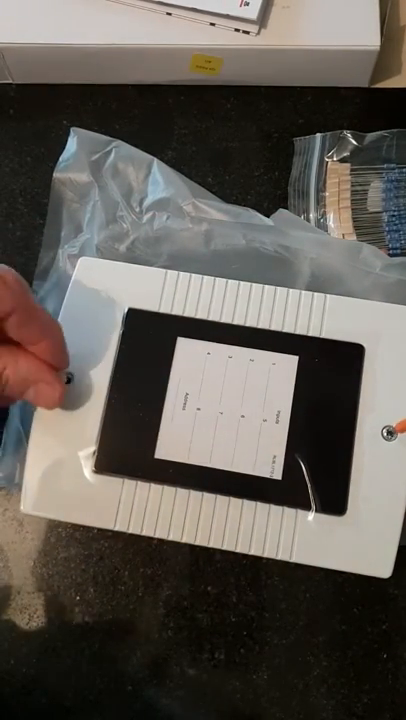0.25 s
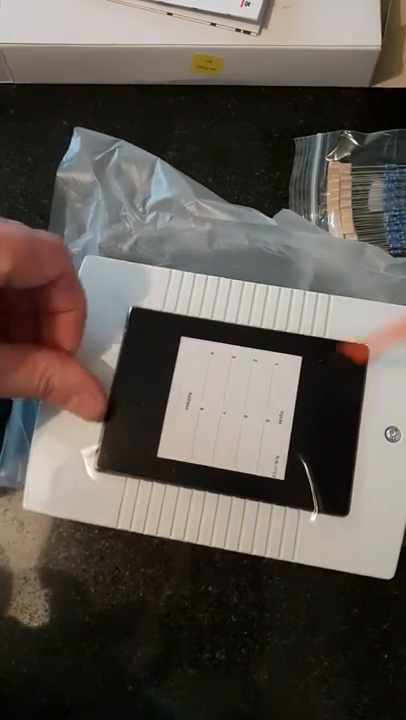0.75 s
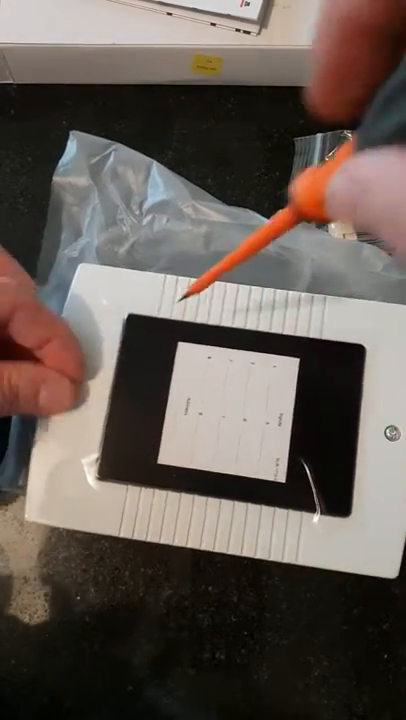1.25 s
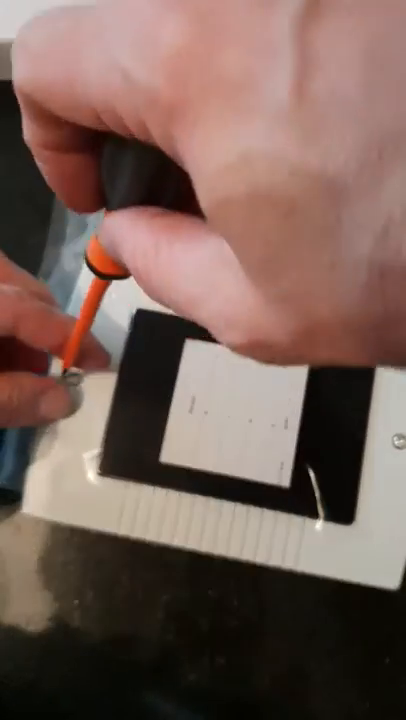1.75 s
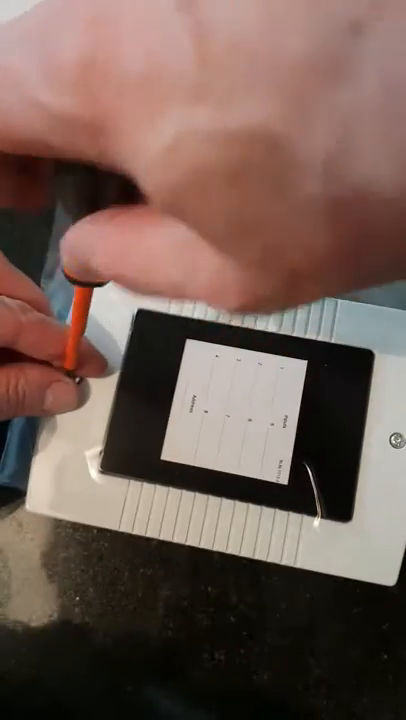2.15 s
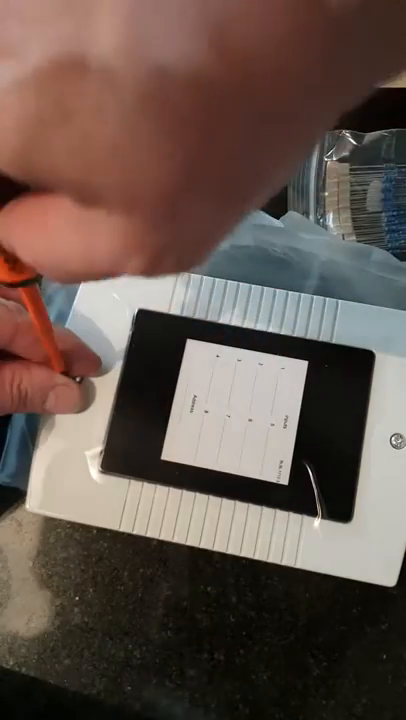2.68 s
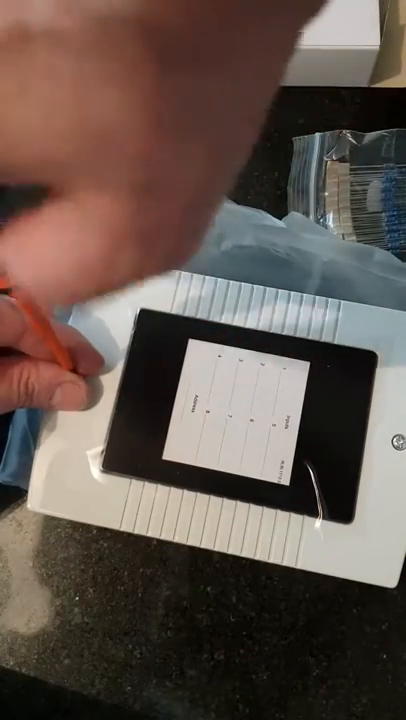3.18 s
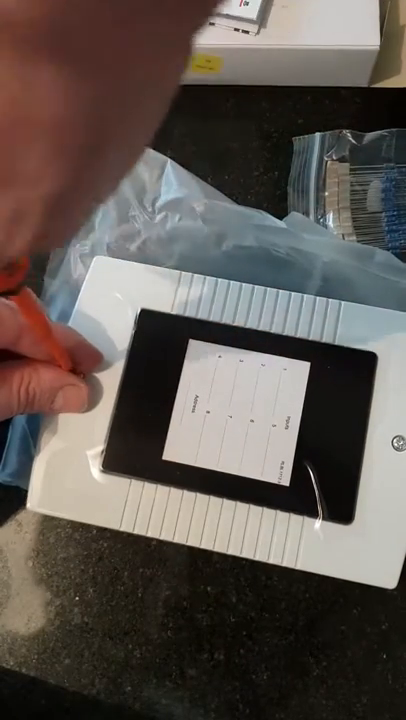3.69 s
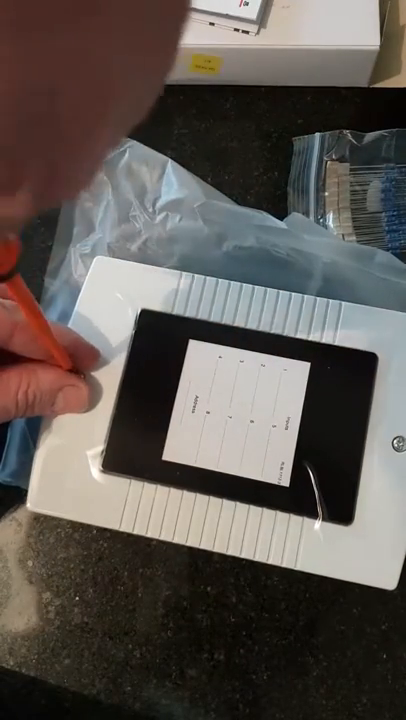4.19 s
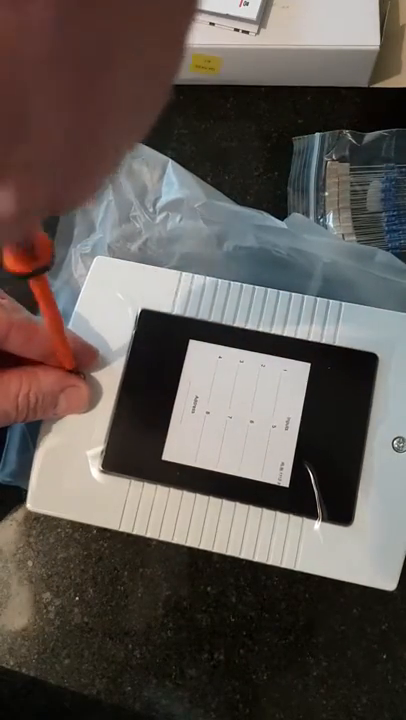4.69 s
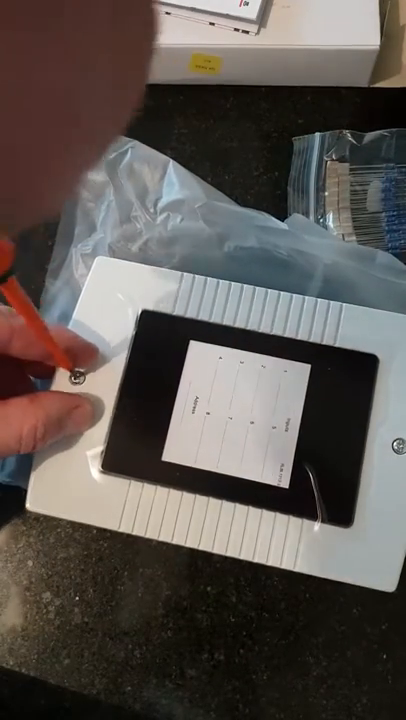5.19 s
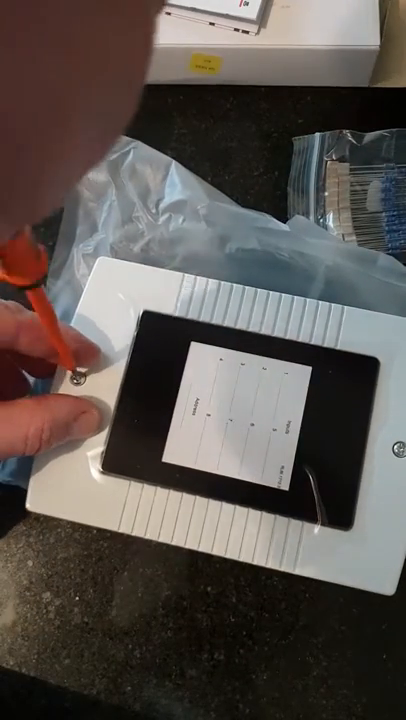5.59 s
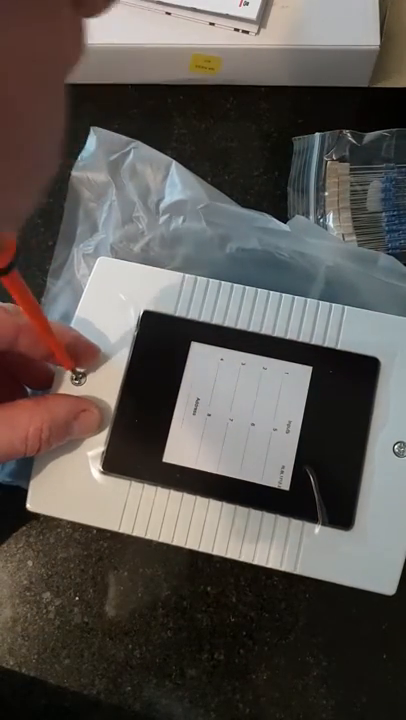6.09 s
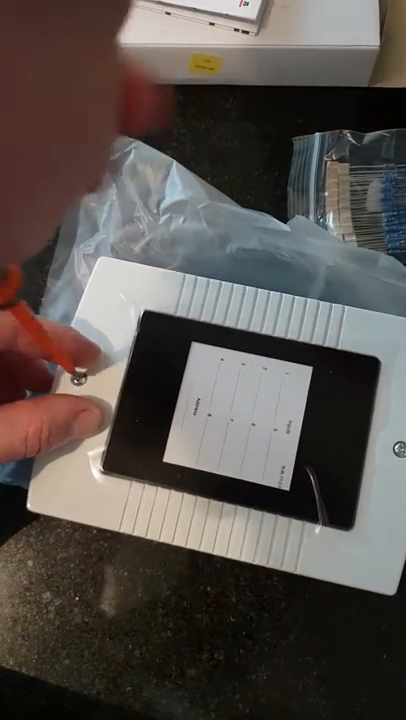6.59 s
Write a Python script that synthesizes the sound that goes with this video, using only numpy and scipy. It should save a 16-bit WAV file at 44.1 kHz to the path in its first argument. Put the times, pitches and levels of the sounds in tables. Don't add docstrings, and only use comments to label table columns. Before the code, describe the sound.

Quick light clicks of a screw settling in its hole, a brighter burst of tool rattles, a loud slip, then sparse irregular turning ticks. Each turn nudges the hollow plastic case into a short low knock, with fine metallic friction. Everything is near and detailed in a quiet indoor space, with slight hand rumble through the table.

```python
import sys
import numpy as np
from scipy import signal
from scipy.io import wavfile
from scipy.ndimage import uniform_filter1d

SR = 44100
rng = np.random.default_rng(int(sys.argv[2]) if len(sys.argv) > 2 else 0)


def linear_from_db(decibels):
    return 10 ** (np.asarray(decibels, float) / 20)


def wrap_up_sound(samples):
    columns = np.atleast_2d(samples).T
    tamed = np.clip(columns, -1, 1)
    steps = np.round(tamed * 32767).astype(np.int16)
    wavfile.write(sys.argv[1], SR, steps)


N = 302067

EDGES_HZ = 20 * 2 ** np.arange(0, 10.1, .5)
# [f/Hz, likeness/0-1]
LIKENESS = [(40, .5), (130, .92), (300, .97), (700, .8), (1500, .45), (3000, .1), (15000, 0)]
# [f/Hz, density/dB]
HUSH_SPECTRUM = [(20, -30), (75, -1.5), (170, -15.5), (500, -21), (1000, -32.5), (2400, -29), (7000, -35.5),
                 (15500, -33)]
# [t/s, rumble level/dB]
LEAN = [(0.0, -63), (0.32, -78.5), (0.59, -55.5), (0.86, -62.5), (1.93, -74.5), (2.4, -64), (2.56, -61),
        (3.45, -73.5), (3.53, -69.5), (3.95, -62.5), (4.3, -62.5), (5.95, -69.5), (6.85, -67.5)]
# [f/Hz, t60/s, level/dB]
ROOM = [(94, 0.45, -2.5), (296, 0.24, -1), (960, 0.34, -6.5), (2680, 0.31, -2.5), (5670, 0.37, -6.5),
        (11000, 0.23, -4.5), (15400, 0.36, -10)]
# [f/Hz, density/dB]
SKIN = [(410, -53.5), (800, -6), (1900, -17.5), (2330, 1), (4210, 2), (8210, -10.5), (10700, 2),
        (15500, -25.5)]
# [t/s, level/dB, fade/(dB/s)]
SLIPS = [(0.66, -60, 91), (1.26, -57.5, 46), (2.103, -44, 142), (2.487, -40, 151), (3.03, -57, 282.5),
         (3.879, -56.5, 101), (4.402, -76, 28), (4.749, -64, 55), (5.588, -54.5, 168.5), (5.89, -60.5, 117),
         (6.299, -64, 152.5), (6.469, -69, 47)]
# [t/s, level/dB, length/s, rise/s]
BRUSHES = [(1.821, -59.5, 0.086, 0.043), (2.277, -42.5, 0.046, 0.05), (3.309, -69.5, 0.042, 0.0062),
           (3.555, -58, 0.045, 0.0046), (4.166, -55.5, 0.034, 0.0082), (4.264, -52.5, 0.026, 0.0073),
           (5.272, -62.5, 0.068, 0.02), (5.782, -53.5, 0.06, 0.0074), (6.649, -69, 0.014, 0.012)]
# [t/s, level/dB, f/Hz, fade/(dB/s)]
DRAGS = [
    (2.66, -64, 780, 26),
    (2.872, -68, 1800, 25),
]
# [f/Hz, t60/s]
THUD_MODES = [
    (131, 0.47),
    (226, .11),
    (295, 0.073),
    (432, 0.13),
]
# [f/Hz, t60/s]
LID_MODES = [(470, 0.11), (520, 0.12), (575, 0.12), (633, 0.13), (710, 0.09), (770, 0.08), (830, 0.046)]
# [t/s, table level/dB, case level/dB, place: 0 base 1 shell 2 cavity 3 lid]
BUMPS = [(0.038, -71, -54, 3.27), (0.207, -58, -55, 1.4), (0.335, -57, -49.5, 0.85),
         (0.504, -62, -54, 0.033), (0.531, -43, -45.5, 0.1), (0.564, -57, -46, 2), (0.573, -44, -50, 1.15),
         (0.695, -76, -51, 0.05), (0.782, -64, -47.5, 0.19), (0.905, -56, -42.5, 0.49),
         (0.864, -58, -47.5, 0.23), (0.948, -60, -55, 0.49), (1.004, -43, -39, 0.59),
         (1.03, -85, -50.5, 0.2), (1.1, -67, -47.5, 0.61), (1.245, -48, -46, 0.49),
         (1.35, -62, -56.5, 0.033), (1.502, -58, -61, 0.091), (1.638, -49, -47, 0.56),
         (2.084, -52, -48, 0.69), (2.432, -51.5, -41, 1.1), (2.4811, -34.5, -29.5, 3),
         (2.51, -42, -41, 0.18), (2.6, -51, -50.5, .02), (2.872, -72, -56.5, 2.4),
         (2.931, -60, -47.5, 2.45), (3.004, -60, -41, 2.9), (3.029, -52.5, -48, 3.1),
         (3.301, -64.5, -56.5, 0.09), (3.56, -61, -58, 0.04)]
# [t/s, table level/dB, case level/dB, place as above]
PRESSES = [(3.883, -66.5, -52, 2.8), (4.06, -56, -51, 1.85), (4.376, -61, -44.5, 2.53),
           (4.456, -69, -54.5, 3.8), (4.716, -69, -49, 3.4), (4.865, -63, -50, 3.5),
           (5.054, -55.5, -44, 2.4), (5.092, -72, -49.5, 2.2), (5.219, -60, -47, 2.2), (5.394, -51, -39, 2),
           (5.428, -58, -51, 0.21), (5.541, -55, -45.5, 3.16), (5.59, -70, -58, 1.8),
           (5.727, -50.5, -39, 2.46), (5.766, -49.5, -54, 0.1), (5.888, -56.5, -55.5, 0.087),
           (6.079, -59, -54, 2), (6.085, -48, -44, 2.7), (6.241, -59.5, -49, 3.2), (6.428, -61, -44, 2.62),
           (6.574, -59.5, -48, 2.9), (6.793, -68, -57.5, 3), (6.828, -60.5, -51, 3.7)]
PART_DB = [0.14, 0.18, 0.052, 0.289]
# [t/s, level/dB, slack share/0-1]
SINGS = [(4.377, -44.5, 0.07), (4.718, -49, 0.13), (5.3942, -40, 0.01), (5.5423, -49, 0.35),
         (5.7252, -38, 0.14), (6.0853, -41, 0.09), (6.4273, -50.5, 0.03), (4.2004, -59, 1), (5.219, -70, 1),
         (6.2405, -50, 0.94), (6.577, -54, 0.86)]
# [f/Hz, t60/s]
SHANK_MODES = [(2600, .0045), (1650, .006), (3450, .0075), (4300, .004), (5350, .008)]
LOADED_DB = [8, -4.5, -29, 3, -19]
SLACK_DB = [-12, -18, -2, -16, 0]
# [t/s, level/dB, f/Hz, fade/(dB/s)]
RUBS = [(0.048, -57.5, 1610, 161), (1.242, -39.5, 3420, 299.5), (2.48, -47, 1490, 500),
        (2.774, -54.5, 1560, 349), (2.872, -63, 458, 33), (2.935, -66, 3900, 80), (2.481, -31.5, 746, 302),
        (4.059, -63, 1750, 252), (4.2, -63, 2250, 202), (4.2, -72, 1087, 159.5), (5.829, -49, 3530, 210)]
# [t/s, peak/dB, f/Hz, t60/s]
JOLTS = [(1.1, -58, 60, .2), (1.931, -60, 60, 0.18), (2.141, -54, 60, .2), (3.56, -52, 61.8, 0.27),
         (5.22, -59, 55, 0.16), (5.538, -51, 50, 0.13), (5.89, -51, 59.8, 0.13), (6.239, -52, 55.6, 0.16),
         (6.559, -46, 50.2, 0.16), (4.001, -60, 64.5, 0.27), (5.8, -63, 44.7, .15)]
# [t/s, peak/dB, f/Hz, t60/s]
BOOMS = [(4.719, -51, 430, 0.26), (4.719, -48, 620, 0.12), (4.868, -53, 604, .08), (4.866, -50, 225, 0.13),
         (5.394, -42, 310, .06), (5.429, -39, 225, 0.096), (5.543, -46, 530, 0.2), (5.727, -39, 303, .07),
         (5.892, -43.5, 228, 0.16), (5.955, -51, 228, 0.13), (6.084, -46, 350, .06),
         (6.241, -40, 260, 0.057), (6.27, -58, 540, .1), (6.43, -46, 445, 0.2), (6.432, -51, 616, .08),
         (6.577, -48, 580, 0.07), (6.579, -47, 450, 0.2), (6.665, -55, 215, .08), (.805, -48, 225, .1),
         (.337, -48, 300, .06), (1.008, -37, 200, 0.049), (1.5, -56, 215, .1), (.572, -36, 300, .03),
         (.908, -42, 370, .04)]
# [t/s, peak/dB, f/Hz, t60/s]
KNOCKS = [(2.438, -36.5, 285, 0.079), (2.4823, -15.5, 288, 0.038), (2.4805, -13.5, 743, 0.021),
          (2.4805, -29.5, 1330, 0.033), (2.483, -26, 424, 0.12), (2.601, -33, 218, 0.091),
          (2.71, -46.5, 215, 0.076), (4.041, -57, 4080, 0.0078), (4.058, -58, 1740, .02),
          (4.072, -59, 1740, 0.018), (4.2009, -50, 2150, .04), (4.2009, -58.5, 1125, 0.09),
          (4.3779, -38.5, 1745, 0.027), (4.3779, -39.5, 4020, 0.027), (4.46, -63, 479, .05),
          (4.519, -51.5, 396, 0.1), (4.865, -56, 2140, .02), (5.218, -51.5, 2120, 0.026),
          (5.3936, -42, 2670, 0.017), (5.5415, -33.5, 2520, 0.02), (5.5928, -43, 4060, 0.014),
          (5.7269, -47, 1740, 0.018), (5.8918, -37, 2120, 0.023), (6.2407, -42, 1950, 0.019),
          (6.2407, -43, 5380, 0.014), (6.576, -47, 2210, 0.017), (0.8628, -27.5, 4610, 0.022),
          (0.8628, -35, 3090, 0.033), (1.0081, -26.5, 4680, .018), (1.036, -29, 2400, .02),
          (1.1735, -39, 1246, .04), (1.2424, -21, 2870, .018), (1.275, -42, 2900, .015),
          (1.25, -45.5, 721, 0.076), (3.19, -56.5, 444, 0.021), (2.4815, -17.5, 1470, 0.0075),
          (2.4825, -19.5, 4330, 0.0082), (.79, -56, 535, 0.086), (3.012, -35, 310, .08),
          (5.542, -42, 229, 0.11), (.047, -46, 785, 0.047)]
# [t/s, peak/dB, f/Hz]
GLINTS = [(0.0463, -37.5, 9000), (0.207, -57, 7070), (0.336, -35.5, 8300), (0.5195, -53, 9660),
          (0.56, -34.5, 9690), (0.6374, -60, 7530), (0.864, -30, 7630), (1.006, -28, 9460),
          (1.036, -43, 8210), (1.1543, -51, 11450), (1.1736, -38, 7980), (1.225, -30, 10900),
          (1.2424, -50, 7300), (1.3588, -46.5, 9750), (1.6232, -62, 8260), (1.6393, -33, 7160),
          (1.734, -43, 8150), (2.08, -37.5, 7250), (2.1087, -31.5, 9300), (2.313, -36, 11000),
          (2.4272, -22, 7460), (2.4815, -15.5, 11400), (2.9362, -52, 7340), (2.9975, -39, 7440),
          (3.0309, -38.5, 7230), (3.563, -47, 9900), (3.8811, -49, 7420), (4.367, -49, 8120),
          (4.3796, -43.5, 7660), (4.7164, -39.5, 7330), (5.0968, -42, 9460), (5.219, -40.5, 9110),
          (5.3946, -30, 7550), (5.4266, -38, 9700), (5.5416, -39, 10300), (5.7275, -40, 7710),
          (5.7688, -39, 9740), (5.8905, -51, 9360), (6.0868, -41, 7860), (6.105, -39, 9700),
          (6.2417, -41, 7500), (6.429, -41.5, 7660), (6.577, -36.5, 10840), (6.8325, -34.5, 9070)]
# [t/s, left over right/dB]
SIDEWAYS = [(0, -2), (1.2, -2), (2.5, -0.5), (3.2, 1), (4, 1.5), (6, 3), (6.86, 4)]
# [f/Hz, level/dB, t60/s]
WALL_MODES = [(950, -4, .012), (1170, -2, .012), (1300, 0, .012), (1500, 1, .01), (1765, 1, .01)]
# [t/s, peak/dB, tick f/Hz, wall level/dB, room send/dB]
FUMBLES = [(0.0448, -28, 4870, -6, -12.5), (0.2066, -28, 2080, -10, -8.5), (0.3349, -36.5, 1980, -57, -3.5),
           (0.3479, -25, 3670, -35, -21), (0.394, -33.5, 3680, -0.5, -16.5), (0.5196, -28, 4270, -8.5, -8),
           (0.5308, -24.5, 2600, -15, -17), (0.5608, -26.5, 2420, -9, -15.5), (0.5721, -33, 2300, 0, -37),
           (0.637, -26, 2270, -1, -14.5), (0.6488, -22.5, 2420, -13, -16), (0.6768, -32, 3980, -3, -13.5)]
# [t/s, peak/dB, tick f/Hz, wall level/dB, room send/dB]
RATTLES = [(0.8618, -13, 3970, -18.5, -12), (0.9021, -20.5, 3580, -7, -16.5), (0.947, -26, 2700, -9, -17.5),
           (1.0078, -13, 4250, -9, -12.5), (1.036, -17.5, 2500, -17, -18.5), (1.1548, -43, 4340, -21, -3),
           (1.1734, -27, 2700, -14, -7.5), (1.2248, -25.5, 6000, -32, -32), (1.2416, -18, 3600, -16, -15.5),
           (1.3597, -39.5, 2750, -30, -8), (1.6222, -36.5, 4840, -51, -23),
           (1.6388, -23.5, 2410, -5.5, -11), (1.734, -33.5, 5500, -38, -14)]
# [t/s, peak/dB, tick f/Hz, wall level/dB, room send/dB]
SEATINGS = [(2.0812, -31, 2320, -3.5, -10), (2.1108, -27, 5600, -24, -17), (2.426, -19, 2420, -3, -7.5),
            (2.4796, -4, 1780, -15.5, -17), (2.782, -45, 2800, -29, -7), (2.872, -47.5, 2090, -6, -8.5),
            (2.935, -37, 2120, -10, -8.5), (2.9965, -31.5, 2200, -3, -8), (3.0116, -26.5, 2070, -3, -11),
            (3.031, -22.5, 2030, -14, -14.5)]
# [t/s, peak/dB, tick f/Hz, wall level/dB, room send/dB]
BITES = [(3.882, -49.5, 2310, -12, -5.5), (4.3669, -56, 3550, 10.5, -0.5), (4.3779, -25, 3900, -21, -17),
         (4.4172, -32, 4200, -21, -23), (4.464, -47, 4280, -0.5, -11), (4.7171, -26, 2410, -21, -10),
         (5.0552, -49, 1750, -1, -9.5), (5.0771, -50, 2050, 0.5, -0.5), (5.0981, -35, 2540, -16, -14),
         (5.3935, -16.5, 2590, -39, -17.5), (5.4266, -31.5, 2310, -3.5, -8.5),
         (5.7199, -33.5, 2330, -10, -1), (5.7265, -19, 2770, -65, -19), (6.0856, -23.5, 3300, -22.5, -17),
         (6.106, -30.5, 4310, -5.5, -11.5), (6.4273, -27, 2610, -16.5, -12), (6.797, -54.5, 1860, -1, -0.5),
         (6.833, -31, 4300, -54.5, -13.5)]
# [t/s, peak/dB, tick f/Hz, wall level/dB, room send/dB]
RELEASES = [(4.0415, -52.5, 4220, -23.5, -8.5), (4.073, -43.5, 4020, -27.5, -12),
            (4.2012, -61, 2180, -16, -19), (4.528, -45, 5210, -34, -9.5), (4.866, -44.5, 2410, -11, -13),
            (5.218, -39, 5620, -14.5, -9), (5.5417, -27.5, 2400, -17, -14), (5.5935, -45, 4050, -17, -30),
            (5.8918, -36.5, 2305, -62, -13.5), (6.242, -32.5, 5460, -25.5, -10.5),
            (6.576, -39, 2180, -3, -12.5)]
CRACK_DB = [
    -21.5,
    -17,
    -23,
    -14.5,
    -9,
]

STIFFEN_SHARE, STIFFEN_S = .13, .012
WAVER_S, WAVER_HZ = .00018, 24


def rms_one(x):
    return x / np.sqrt(np.mean(x ** 2) + 1e-20)


def at_hz(points, hz, column=1):
    points = np.array(points)
    return np.interp(np.log(hz), np.log(points[:, 0]), points[:, column])


def in_time(rows):
    t, db = np.transpose(rows)
    return np.interp(np.arange(N) / SR, t, db, left=-120, right=-120)


def drift(rate_hz):
    r = np.exp(-80 * np.pi * rate_hz / SR)
    white = rng.standard_normal(N // 40 + 2002)
    slow = signal.lfilter([1], [1, -2 * r, r * r], white)[2000:]
    return np.interp(np.arange(N) / 40, np.arange(len(slow)), rms_one(slow))


def ring(clicks, hz, t60_s):
    r, w = linear_from_db(-60 / (t60_s * SR)), 2 * np.pi * hz / SR
    return signal.lfilter([0, np.sin(w)], [1, -2 * r * np.cos(w), r * r], clicks + 1e-18)


def cut(x, hz, kind, order=2):
    return signal.sosfilt(signal.butter(order, hz, kind, fs=SR, output="sos"), x)


def decay(pushes, factor):
    return signal.lfilter([1], [1, -factor], pushes)


def at_events(s, db, gain):
    pushes = np.zeros(N)
    pushes[(s * SR).astype(int)] = linear_from_db(db) * gain
    return pushes


def stiffen(since_s):
    return -STIFFEN_SHARE * STIFFEN_S * (1 - np.exp(-since_s / STIFFEN_S))


def bands(gain_at, size, alike_share):
    out, white = 0, rng.standard_normal((2, 2, size))
    for k, (low, high) in enumerate(zip(EDGES_HZ, EDGES_HZ[1:])):
        mid, side = cut(white[k % 2], [low, high], "band")
        hz = np.sqrt(low * high)
        alike = np.clip(alike_share * at_hz(LIKENESS, hz), 0, 1)
        stereo = np.sqrt(1 + alike) * mid + np.sqrt(1 - alike) * side * [[1], [-1]]
        out = out + gain_at(hz) * stereo
    return out


def hush():
    noise = bands(lambda hz: linear_from_db(at_hz(HUSH_SPECTRUM, hz)), size=N, alike_share=0.85)
    return linear_from_db(-66.5) * rms_one(noise)


def lean():
    white, weight_db = rng.standard_normal((3, N)), in_time(LEAN)
    table = ring(white[:2] + 1.5 * white[2], 67, .2)
    rumble = rms_one(table + 7 * cut(white[:2], [45, 95], "band"))
    rumble_db = weight_db + 1.9 * drift(3.2) + np.array([[3.5], [-3.0]])
    murmur = rms_one(sum(ring(white[2] * linear_from_db(4.0 * drift(43)), hz, 0.78 * t60) for hz, t60 in THUD_MODES))
    murmur_db = -72 + 2 * (weight_db - weight_db.mean())
    return rumble * linear_from_db(rumble_db) + murmur * linear_from_db(murmur_db)


def room(send):
    t = np.arange(SR // 2) / SR

    def band_gain(hz):
        return linear_from_db(at_hz(ROOM, hz, column=2) - 60 * t / at_hz(ROOM, hz))

    tail = bands(band_gain, size=len(t), alike_share=0.34)
    tail = tail * (1 - np.exp(-t / 0.00073))
    tail = tail / np.sqrt(np.sum(tail ** 2) / 2)
    return signal.fftconvolve(send[None], tail, axes=1)[:, :N]


def slips():
    t, level = np.arange(N) / SR, 0
    for s, db, fade in SLIPS:
        level = level + linear_from_db(db - fade * np.maximum(t - s, 0)) * np.clip((t - s) / 0.0019, 0, 1)
    for s, db, length, rise in BRUSHES:
        fall_db = 60 * np.maximum(t - s - length, 0) / 0.35
        level = level + linear_from_db(db - fall_db) * np.clip((t - s) / rise, 0, 1)
    hiss = bands(lambda hz: linear_from_db(at_hz(SKIN, hz) + 1.3 * drift(25)), size=N, alike_share=0.26)
    return level * rms_one(hiss * linear_from_db(2.2 * drift(170)))


def rubs(rows):
    out, t = np.zeros((2, N + SR)), np.arange(SR // 4) / SR
    white = rng.standard_normal((len(rows), 2, len(t)))
    for (s, db, hz, fade), noise in zip(rows, white):
        t60_s = 7.0 / hz
        tone = rms_one(ring(ring(noise + noise[0], hz, t60_s), hz, t60_s))
        shape = np.clip(t / 0.0044, 0, 1) * np.clip((t[-1] - t) / 0.11, 0, 1)
        i = int(s * SR)
        out[:, i:i + len(t)] += tone * linear_from_db(db - fade * t) * shape
    return out[:, :N]


def thuds():
    s, table_db, case_db, place = np.transpose(BUMPS + PRESSES)
    parts_db = [table_db]
    for k, part_db in enumerate(PART_DB):
        steps = np.abs((place - k + 2) % 4 - 2)
        parts_db.append(case_db + part_db - 9 * steps)
    chance = rng.standard_normal((len(s), 20)).T
    white = rng.standard_normal((len(parts_db), N))
    rock_factor = np.exp(-1 / (0.024 * SR))
    rocks = [0.085 * noise * decay(at_events(s, db, 0.85), rock_factor) for db, noise in zip(parts_db, white)]
    t = np.arange(N) / SR
    hz, t60 = THUD_MODES[0]
    power = decay(at_events(s, table_db, linear_from_db(4.0)) ** 2, linear_from_db(-120 / (t60 * SR)))
    table = np.sqrt(power) * np.sin(2 * np.pi * hz * t)
    case, twins = 0, 0
    for k, (hz, t60) in list(enumerate(THUD_MODES))[1:]:
        push = at_events(s, parts_db[k], np.sign(chance[k]) * linear_from_db(2.0))
        case = case + ring(push + rocks[k], hz, t60)
        twin_push = at_events(s, parts_db[k], .6 * chance[-1 - k])
        twins = twins + ring(twin_push + rocks[k], .94 * hz, .6 * t60)
    for (hz, t60), g in zip(LID_MODES, chance[len(THUD_MODES):]):
        push = at_events(s, parts_db[-1], 0.38 * g)
        case = case + ring(push + 0.5 * rocks[-1], hz, 0.74 * t60)
    starts = np.sort(np.append(s, 0))
    since = t - starts[np.searchsorted(starts, t, "right") - 1]
    waver = WAVER_S * rms_one(cut(white[0], WAVER_HZ, "low"))
    case = np.interp(stiffen(since) + waver + t, t, case)
    case = cut(case + twins * np.array([[1.15], [.8]]), 150, "high")
    both = cut(table, 175, "low") * linear_from_db([[1.2], [-1.2]]) + case
    return cut(cut(both, 790, "low", order=1), 100, "high")


def shank():
    white, out = rng.standard_normal((2, N)), 0
    s, db, slack = np.transpose(SINGS)
    slack = np.clip(slack, 0, 1)
    for k, (hz, t60) in enumerate(SHANK_MODES):
        mode_db = (1 - slack) * LOADED_DB[k] + slack * SLACK_DB[k]
        pushes = at_events(s, db + mode_db, linear_from_db(-14 + (k > 0) * 6))
        load = decay(pushes, linear_from_db(-60 / (.33 * SR)))
        load = uniform_filter1d(load, size=200, origin=99)
        out = out + load * linear_from_db(2.7 * drift(49)) * rms_one(ring(ring(white, hz, t60), hz, t60))
    return out


def knocks():
    glints = [(s, db + 1, hz, 7.0 / hz) for s, db, hz in GLINTS]
    rows, size = KNOCKS + JOLTS + glints + BOOMS, SR // 4
    out, send, t = np.zeros((2, N + size)), np.zeros(N + size), np.arange(size) / SR
    short = size // 10
    grit = rng.standard_normal((len(rows), 2, short))
    for (s, db, hz, t60), noise in zip(rows, grit):
        push = np.zeros((2, size))
        push[:, :short] = 0.3 * noise * np.exp(-t[:short] / 0.0027) * min(hz / 2500, 1)
        push[:, 0] = -1
        sound = ring(push, min(hz, 15500), t60) * np.clip((t[-1] - t) / .03, 0, 1)
        sound = cut(sound, .55 * hz, "high")
        sound = linear_from_db(db) * sound / np.abs(sound[0]).max()
        if 330 < hz < 660:
            waver = WAVER_S * np.sin(2 * np.pi * WAVER_HZ * t + 3 * noise[0, 0])
            bent = t + stiffen(t) + waver
            sound = np.array([np.interp(bent, t, side) for side in sound])
        i = round(s * SR)
        out[:, i:i + size] += sound
        send_db = np.interp(np.log(hz), np.log([300, 900, 5600, 7000]), [-17, -26, -26, -7.5])
        send[i:i + size] += sound[0] * linear_from_db(send_db)
    return out[:, :N], send[:N]


def ticks():
    kinds = [FUMBLES, RATTLES, SEATINGS, BITES, RELEASES]
    rows = sorted(tuple(row) + (crack_db,) for kind, crack_db in zip(kinds, CRACK_DB) for row in kind)
    size = 2048
    dry, send, t = np.zeros((2, N + size)), np.zeros(N + size), np.arange(size) / SR
    chatter = rng.standard_normal((len(rows), 3, size))
    strengths = rng.normal(0, 1, (len(rows), len(WALL_MODES)))
    for k, (s, db, hz, wall_db, send_db, crack_db) in enumerate(rows):
        contact = np.zeros((3, size))
        contact[:2] = 0.21 * np.exp(-t / 0.0031) * (chatter[k, :2] + 0.27 * chatter[k, 2])
        contact[:, 0] = -1
        steel = ring(contact, hz, 8.4 / hz) + 1.8 * ring(contact, 1.587 * hz, 2.34 / hz)
        steel = steel + 2.0 * cut(contact, [1900, 7000], "band")
        crack = cut(contact, [6500, 12000], "band")
        walls = 0
        for (mode_hz, mode_db, t60), g in zip(WALL_MODES, strengths[k]):
            walls = walls + linear_from_db(mode_db + 4.4 * g) * ring(contact, mode_hz, t60)
        top_db = crack_db + 0.33 * wall_db - 0.15 * (db + 47.0)
        parts = [(steel, 0), (crack, top_db + 11.5), (walls, wall_db - 0.5)]
        sound = linear_from_db(db) * sum(linear_from_db(part_db) * part / np.abs(part[0]).max() for part, part_db in parts)
        sound = cut(sound, 900, "high")
        pan_db = np.interp(s, *np.transpose(SIDEWAYS))
        i = round((s + .0008) * SR)
        j = i + round(-1.1 * pan_db)
        dry[0, j:j + size] += sound[0] * linear_from_db(pan_db / 2)
        dry[1, i:i + size] += sound[1] * linear_from_db(-pan_db / 2)
        send[i:i + size] += sound[2] * linear_from_db(send_db)
    return dry[:, :N], send[:N]


def scene():
    quiet = cut(lean() + hush(), 52, "high")
    low = thuds()
    struck, struck_send = knocks()
    tip, tip_send = ticks()
    hands = low + shank() + rubs(RUBS) + slips()
    tail = room(tip_send * linear_from_db(15.0) + low.mean(axis=0) * linear_from_db(-7.5) + struck_send)
    pan = linear_from_db(0.64 * in_time(SIDEWAYS) * [[.5], [-.5]])
    near = tip + pan * (hands + struck + tail + rubs(DRAGS))
    return cut(near, 12300, "low") + quiet


def low_pass(x):
    return signal.sosfilt(signal.butter(12, 16660, fs=SR, output="sos"), x)


def record(dry):
    dipped = dry - 0.22 * cut(dry, [1900, 2250], "band", order=1)
    mix = signal.sosfilt(signal.cheby2(12, 50, 16350, fs=SR, output="sos"), dipped)
    return low_pass(mix)


dry = scene()
out = record(dry)
wrap_up_sound(out)
```